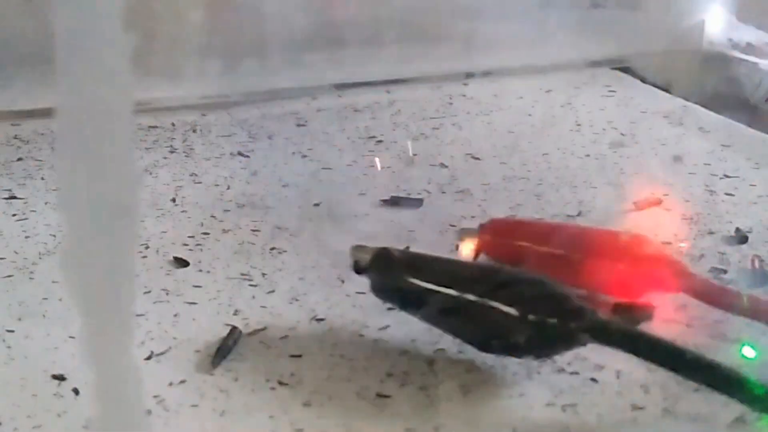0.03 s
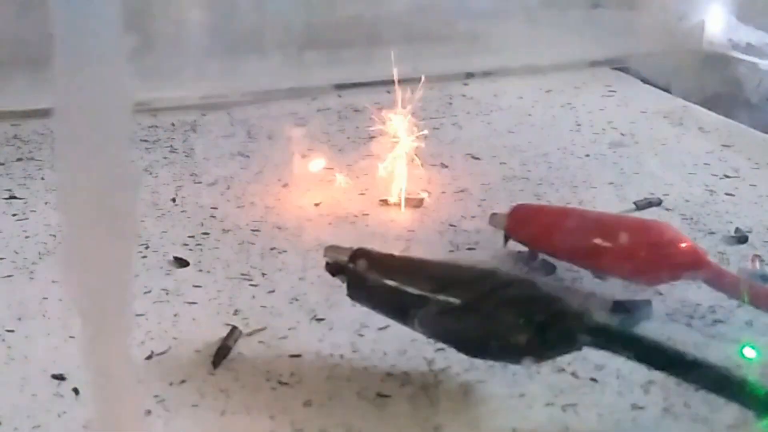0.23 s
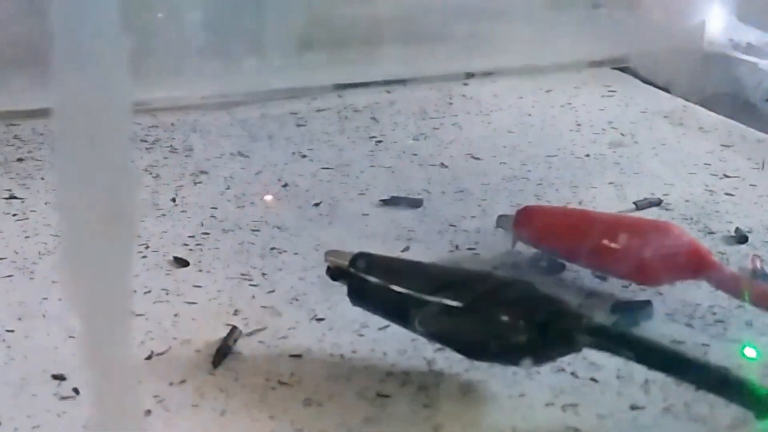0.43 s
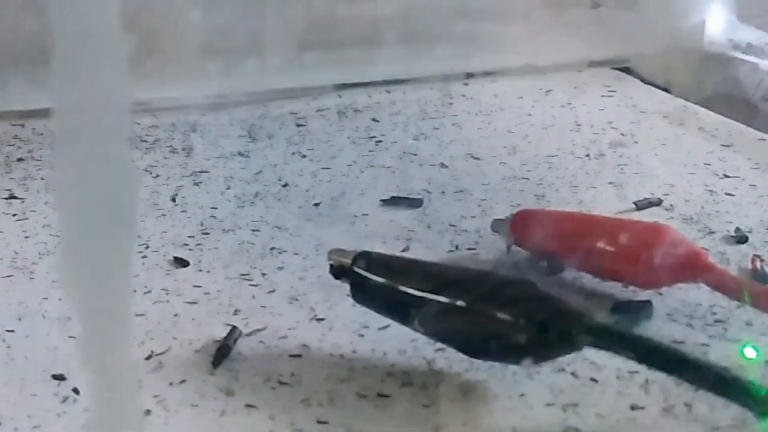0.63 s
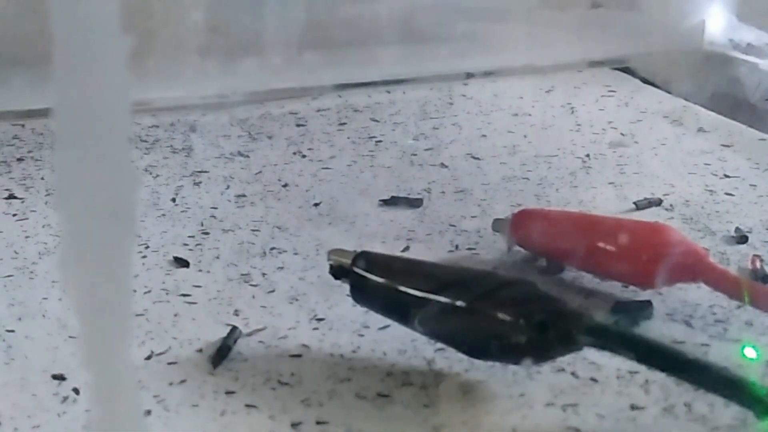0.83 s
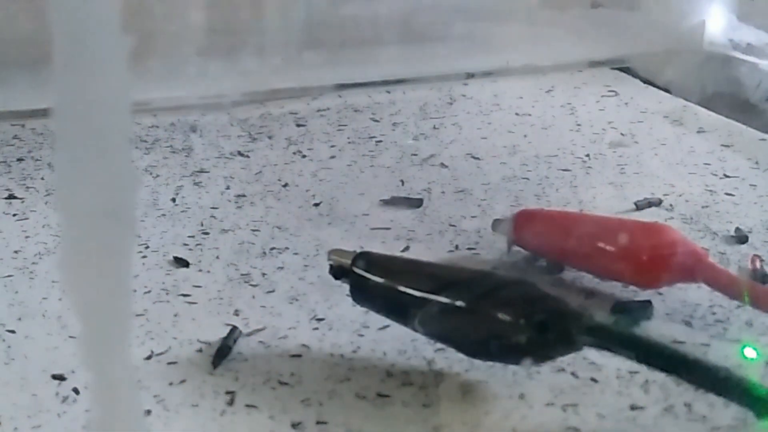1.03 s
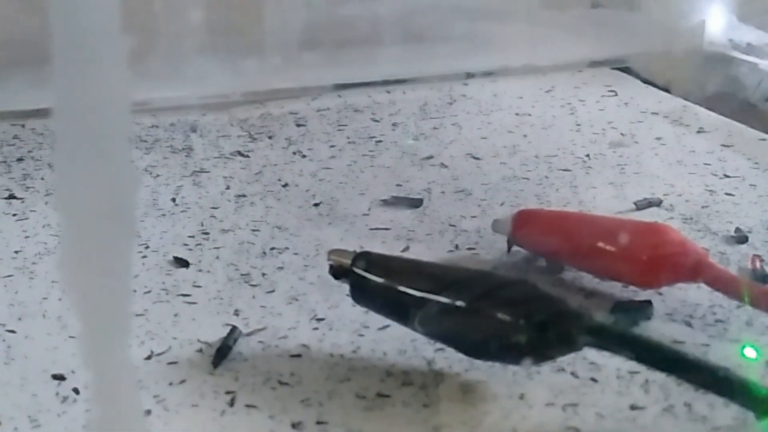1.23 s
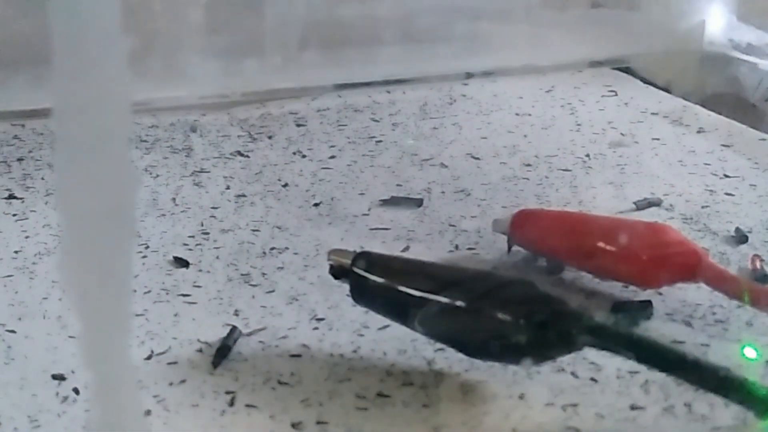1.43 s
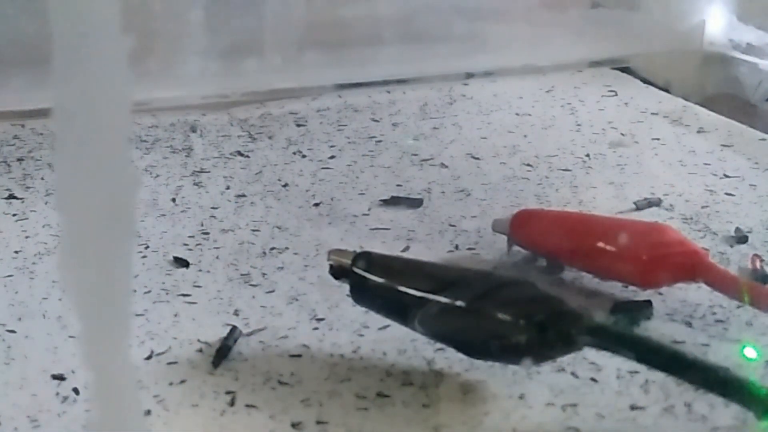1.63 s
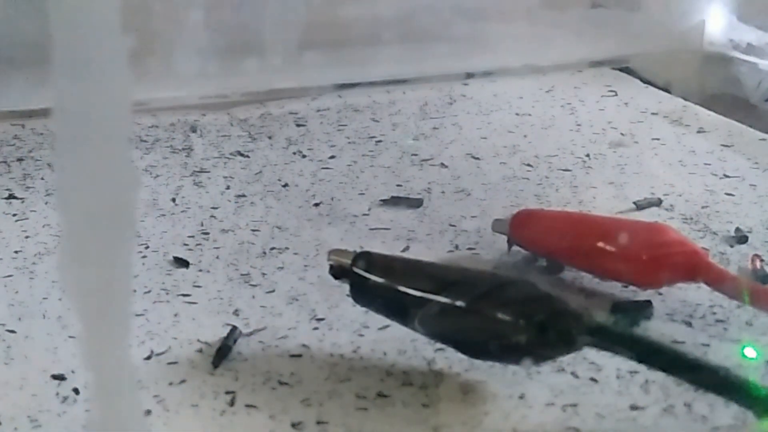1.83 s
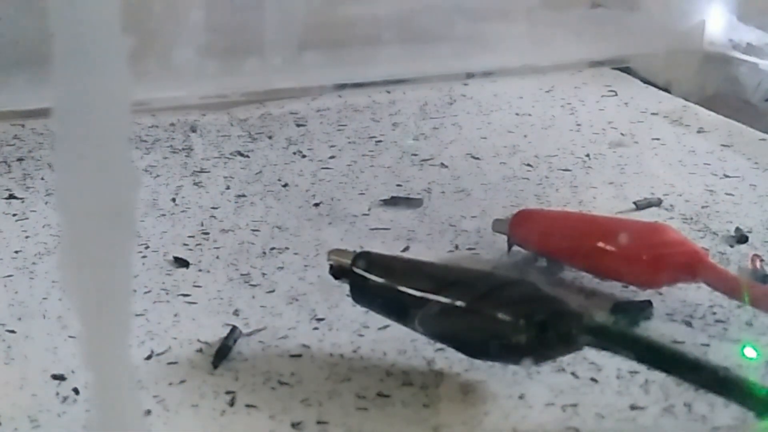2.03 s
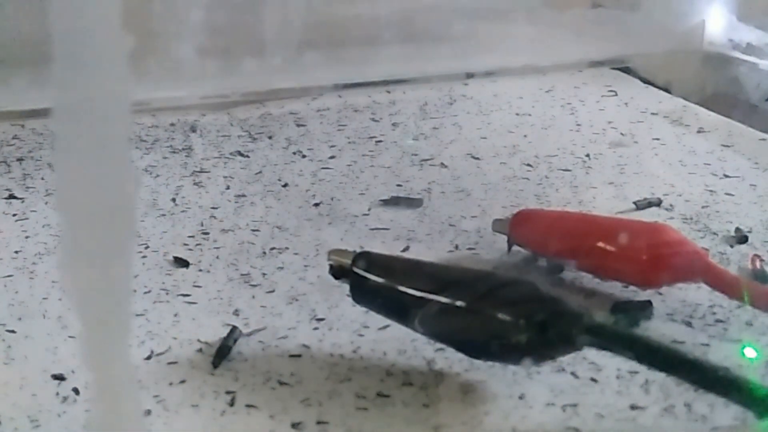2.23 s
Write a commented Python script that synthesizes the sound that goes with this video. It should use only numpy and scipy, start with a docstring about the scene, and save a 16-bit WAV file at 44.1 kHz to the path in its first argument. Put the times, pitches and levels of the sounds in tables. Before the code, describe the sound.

After a brief near-silence, a pencil lead bursts with one violent electrical crack and low thump, close to the microphone in a small hard workshop; dense echoes, sizzling sparks and rumble fade as splinters tick down.

```python
"""A crack and a thump as a pencil lead bursts under a large current in a small hard workshop, heard slowed down.
A dense rattle of early echoes, a long noisy tail, ringing panels and low rumble follow, all shaped from noise.
Splinters tick down on the bench as short band-passed noise bursts; sparks and dust are noise swelling with grains.
The recorder dulls the top, rounds the peaks of the bang and turns quiet sound further down."""
import sys
import numpy as np
from scipy import signal
from scipy.fft import rfft, irfft
from scipy.io import wavfile
from scipy.ndimage import uniform_filter1d

SR = 44100
rng = np.random.default_rng(int(sys.argv[2]) if len(sys.argv) > 2 else 0)


def master(y):
    """Save y as 16-bit WAV."""
    cut = np.clip(np.atleast_2d(y).T, -1, 1)
    pcm = np.round(cut * 32767)  # scale
    wavfile.write(sys.argv[1], SR, pcm.astype(np.int16))


N = 101429
T = np.arange(N) / SR  # time in s
F = np.arange(N // 2 + 1) * SR / N + 1e-3  # spectrum bins in Hz, kept above 0 for the logarithm
BANG_S = .2276
MID_SIDE = np.array([[1], [-1]])  # sign of the side signal in left and right


def undb(db):
    """Decibels to gain."""
    return 10 ** (np.asarray(db) / 20)


def unit(x):
    """Scale to rms 1."""
    return x / np.sqrt(np.mean(x ** 2))


def decay(start_s, t60_s, hold_s=0.):
    """Silent before the start, held, then dying by 60 dB in t60_s."""
    return (T >= start_s) * undb(-60 * np.clip(T - start_s - hold_s, 0, None) / t60_s)


def resonance(x, hz, width_hz):
    """Two-pole band-pass."""
    b, a = signal.iirpeak(hz, hz / width_hz, fs=SR)
    return signal.lfilter(b, a, x)


def steep_resonance(x, hz, width_hz):
    """The same band-pass twice in a row, for steeper skirts."""
    return resonance(resonance(x, hz, width_hz), hz, width_hz)


def stereo_noise(alike):
    """Left and right noise with the given correlation, mixed from independent mid and side."""
    alike = np.clip(alike, -1, 1)
    mid, side = rng.standard_normal((2, N))
    return np.sqrt((1 + alike) / 2) * mid + np.sqrt((1 - alike) / 2) * side * MID_SIDE


def walk(rate_hz):
    """Smooth random wander of rms 1: stepped noise averaged twice."""
    step = int(SR / rate_hz)
    steps = np.repeat(rng.standard_normal(N // step + 1), step)
    return unit(uniform_filter1d(uniform_filter1d(steps, step), step)[:N])


def pan(left_minus_right_db):
    """Left and right gains for a level difference."""
    return undb(left_minus_right_db * MID_SIDE / 2)


def floor():
    """A low uneven rumble: noise narrowed by four equal resonances."""
    rumble_noise = stereo_noise(0.7)
    for _ in range(4):
        rumble_noise = resonance(rumble_noise, hz=38, width_hz=23)
    return undb(-65.5) * unit(rumble_noise)


def whine(dull_hz):
    """A faint wavering whine of narrow noise bands over a thin room hiss, both rising after the bang."""
    # whine bands: centre_hz, width_hz, level_db (once risen)
    whine_bands = [(3655, 45, -83), (3410, 25, -92)]
    tones = 0
    for hz, width_hz, level_db in whine_bands:
        tones = tones + undb(level_db) * unit(steep_resonance(stereo_noise(0.55), hz, width_hz))
    dull = signal.butter(8, dull_hz, fs=SR, output="sos")
    hiss = signal.sosfilt(dull, resonance(stereo_noise(.2), hz=2500, width_hz=6000))
    rise = np.clip((T - BANG_S) / .5, .3, 1)
    return (tones + undb(-89.5) * unit(hiss)) * rise


def rumble():
    """Low room resonances, as narrow noise, that swell after the blast and rumble away."""
    # low room resonances: centre_hz, width_hz, level_db (before swell and decay), t60_s
    room_resonances = [(35.6, 8.1, -28, 2.2), (61, 26, -26.5, 1.8), (81.5, 19, -25.5, 1.6),
                       (147.7, 26, -40, 2)]
    rise_s, side_db = 0.041, -9.5
    since_s = np.clip(T - BANG_S, 0, None)
    out = 0
    for hz, width_hz, level_db, t60_s in room_resonances:
        mid, side = (unit(steep_resonance(v, hz, width_hz)) for v in rng.standard_normal((2, N)))
        swell = (1 - np.exp(-since_s / rise_s)) ** 2 * decay(BANG_S, t60_s)
        out = out + undb(level_db) * swell * (mid + undb(side_db) * side * MID_SIDE)
    return out


def panels():
    """Thin panels around the bench ring on as narrow noise, a little unsteady and unlike left and right."""
    # panel modes: pitch_hz, level_db (relative, before decay), t60_s
    panel_modes = [(458, -9.5, 1.5), (714.5, -11, 1.5), (847, -4, 1.6), (1042, -5, 1.6), (1330, -7, 1.5),
                   (1660, -5, .8), (1807, -0.5, .6), (2320, -4, 0.39), (2970, -2.5, 1.0), (2818, 0.5, .8),
                   (3310, 1.5, 0.62), (3290, -2.5, 0.84), (4150, -6, .7), (5122, -4, 1), (5300, -6.5, 1.3)]
    panels_db, width_hz = -27, 5.5
    out = 0
    for hz, level_db, t60_s in panel_modes:
        ring = unit(resonance(stereo_noise(.3), hz, width_hz))
        out = out + undb(panels_db + level_db) * ring * decay(BANG_S, t60_s)
    return out


def patter():
    """Sizzle of flying sparks, then patter of fine dust: noise swells with random grains, in two bands."""
    # patter level over time: time_s, level_db
    patter_level = [(.26, -36), (0.361, -29.5), (0.479, -32.5), (0.559, -42), (0.801, -45), (.9, -45.5),
                    (1.1, -44.5), (1.17, -46.5), (1.38, -50), (1.47, -60), (1.62, -64), (1.75, -68),
                    (1.95, -78)]
    grains_per_s, scatter_db, smear_s = 1900, 3.5, 0.01
    grains = (rng.random(N) < grains_per_s / SR) * undb(scatter_db * rng.exponential(size=N))
    smeared = signal.lfilter([1], [1, -np.exp(-1 / (smear_s * SR))], grains)
    dust = 0
    for hz, band_db in ((3000, 0), (5200, -3)):
        dust = dust + undb(band_db) * resonance(stereo_noise(0.) * smeared, hz, width_hz=1500)
    time_s, level_db = np.array(patter_level).T
    return unit(dust) * undb(np.interp(T, time_s, level_db, left=-120))


def splinters():
    """Splinters land or skid: each is a burst of band-passed noise with a faint room answer."""
    # splinters: start_s, peak_db (before pan and low cut), ring_hz, left_minus_right_db, t60_s, rise_s
    landings = [(0.86, -33, 3000, 16, 0.027, 0.0077), (0.994, -35.5, 3500, 9, 0.043, 0.0031),
                (1.06, -33, 3100, 5, 0.024, .001), (1.093, -30, 5200, 6, 0.033, 0.0045),
                (1.104, -29.5, 3450, 4, 0.1, 0.0021), (1.22, -36, 4350, 8, 0.085, 0.011),
                (1.245, -34.5, 3000, 3, 0.061, .006), (1.309, -39.5, 4200, 15, 0.043, .006),
                (1.3541, -21, 3300, -1, 0.011, 0.00012), (1.359, -37, 4000, -0.5, 0.017, .0002),
                (1.589, -55.5, 4780, 20, 0.033, 0.0019), (1.682, -48.5, 3600, 3.5, 0.29, 0.0054)]
    width_hz, low_cut_hz = 4300, 2070
    answer_db, answer_late_s, answer_t60_s = -23, 0.0036, 0.52
    out = 0
    for start_s, peak_db, ring_hz, pan_db, t60_s, rise_s in landings:
        tick = np.clip((T - start_s) / rise_s, 0, 1) * decay(start_s, t60_s, rise_s)
        shape = tick + undb(answer_db) * decay(start_s + answer_late_s, answer_t60_s)
        alike = 0.76 * np.exp(-rise_s / 0.00069)  # slower rises sound wider
        hit = steep_resonance(stereo_noise(alike) * shape, ring_hz, width_hz)
        out = out + undb(peak_db) / np.abs(hit).max() * hit * pan(pan_db)
    return signal.sosfilt(signal.butter(4, low_cut_hz, "high", fs=SR, output="sos"), out)


def late():
    """The tail: noise split into overlapping bands, each dying at its own pace and flickering."""
    # tail bands: centre_hz, level_db (relative, per Hz), t60_s, left-right correlation
    tail_bands = [(119.1, -16, 1.7, 0), (147, -8.5, 1.5, 0), (188, -15, 1.9, 1), (453.6, -9, 1.916, 0),
                  (556, -12.5, 1.7, 0), (815, -8.5, 1.79, 0), (1240, -11, 1.7, 0.067),
                  (1900, -10, 1.6, 0.067), (2800, -3, 1.227, 0.6), (3422, 0.5, 1, 0.067),
                  (3890, -7.5, 1.2, 0.033), (5500, -6, 0.73, 0.3), (6713, -36, .9, .1)]
    late_db, flicker_db = -5, 0.43
    log_hz = np.log(np.array(tail_bands)[:, 0])
    out = 0
    for k, (_, level_db, t60_s, alike) in enumerate(tail_bands):
        # share of the power: 1 at this band's centre, fading to 0 at its neighbours
        share = np.interp(np.log(F), log_hz, np.arange(len(log_hz)) == k, left=0, right=0)
        band = irfft(rfft(stereo_noise(alike)) * np.sqrt(share), N)
        flicker = undb(level_db + flicker_db * walk(25))
        out = out + flicker * band * decay(BANG_S + 0.00067, t60_s)
    return undb(late_db) * out


def early():
    """Dense first echoes from the bench and near walls: coloured noise, held briefly, then dying fast."""
    # echo colour: pitch_hz, level_db (relative, per Hz)
    echo_colour = [(160, -52), (280, -20.5), (455, -3.5), (583, -26), (863, -15), (922, -24), (1020, -2),
                   (1140, -26), (1800, -6), (2190, -9.5), (3280, -4.5), (5260, -11), (6400, -22),
                   (8320, -53), (14100, -120)]
    early_db, flicker_db, hold_s, t60_s = -12, 2.0, 0.034, 0.13
    hz, colour_db = np.array(echo_colour).T
    colour = undb(np.interp(np.log(F), np.log(hz), colour_db))
    echoes = unit(irfft(rfft(stereo_noise(.05)) * colour, N))
    return undb(early_db + flicker_db * walk(120)) * echoes * decay(BANG_S + .0003, t60_s, hold_s)


def thump():
    """A push of air and the low bench and room modes struck by the blast, as decaying sines."""
    # struck modes: pitch_hz, level_db, t60_s
    struck_modes = [(30, -24.5, .15), (80, -13, 0.19), (219.3, -20, 0.11)]
    push_db, push_s = -19.5, 0.0033  # peak of the push, and its time after the bang
    since_s = np.clip(T - BANG_S, 0, None)
    out = undb(push_db) * since_s / push_s * np.exp(1 - since_s / push_s)
    for hz, level_db, t60_s in struck_modes:
        out = out + undb(level_db) * np.sin(2 * np.pi * hz * since_s) * decay(BANG_S, t60_s)
    return np.array([out, out])


def crack():
    """The shock: an N-shaped pulse that jumps up and swings below zero, a little later on the right."""
    crack_db, crack_s, right_late_s = 5, .00013, .0004
    start_s = BANG_S + np.array([[0], [right_late_s]])
    u = (T - start_s) / crack_s
    return undb(crack_db) * (1 - u) * (u >= 0) * np.exp(-np.clip(u, 0, 50) / 1.5)


def expand(x, gate_db):
    """Turn a band down in proportion to how far it has sunk below the gate."""
    ratio, smooth_s = 1.354, .06
    now = np.mean(x ** 2, axis=0)
    a = 1 / (smooth_s * SR)
    power = now + signal.lfilter([a], [1, a - 1], now)  # momentary plus smoothed power
    under_db = np.clip(gate_db - 10 * np.log10(power + 1e-14), 0, 30)
    return x * uniform_filter1d(undb(-(ratio - 1) * under_db), size=64)


def scene():
    """The bang and its ringing room, a little louder on the left, with thump, rumble and falling pieces."""
    bang = (crack() + early() + late() + panels()) * pan(0.9)
    return bang + thump() + rumble() + splinters() + patter() + floor()


def record(dry):
    """Dull top, two-band expander above the bass, phase-free low cut, rounded peaks, whine, hiss, cut-off."""
    dull_hz, bass_hz, split_hz, low_cut_hz, top_hz = 5685, 130, 2010, 8.7, 15500
    knee, hiss_db = 3.9, -91  # a higher knee keeps the sound clean closer to the ceiling
    x = signal.sosfilt(signal.ellip(6, 1, 60, dull_hz, fs=SR, output="sos"), dry)
    bass = signal.sosfiltfilt(signal.butter(3, bass_hz, fs=SR, output="sos"), x)
    below_split = signal.sosfiltfilt(signal.butter(3, split_hz, fs=SR, output="sos"), x)
    x = bass + expand(below_split - bass, gate_db=-56) + expand(x - below_split, gate_db=-54)
    x = signal.sosfiltfilt(signal.butter(4, low_cut_hz, "high", fs=SR, output="sos"), x)
    rounded = 1.069 * x / (1 + np.abs(x) ** knee) ** (1 / knee)
    x = rounded + whine(dull_hz) + undb(hiss_db) * rng.standard_normal(x.shape)
    return signal.sosfilt(signal.ellip(8, .2, 40, top_hz, fs=SR, output="sos"), x)


dry = scene()
out = record(dry)
master(out)
```